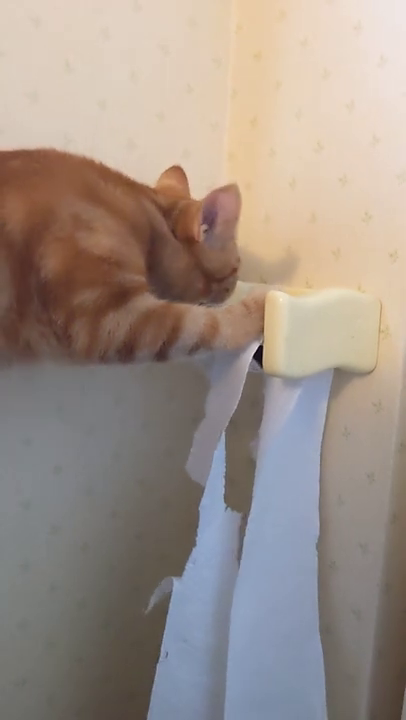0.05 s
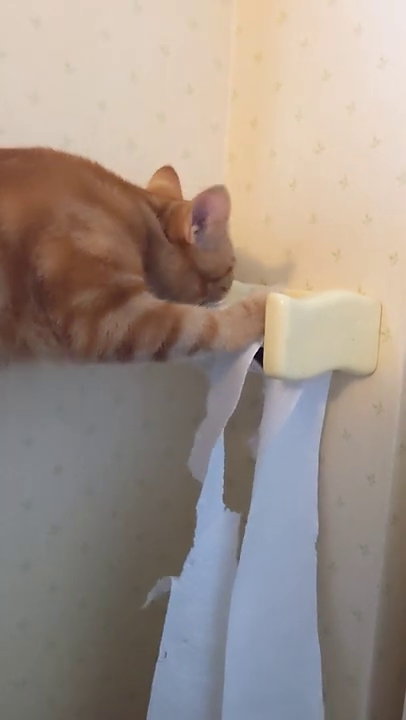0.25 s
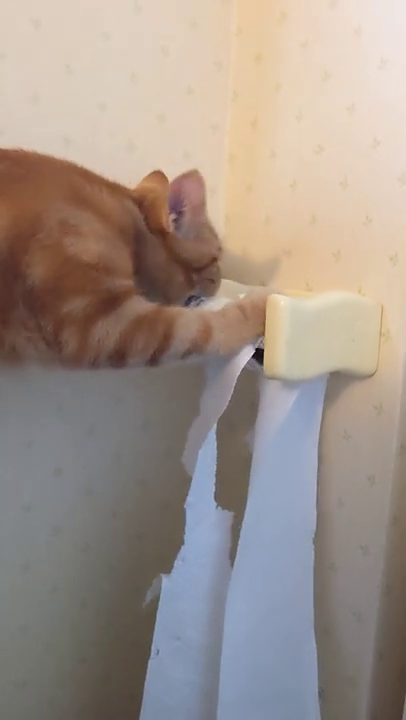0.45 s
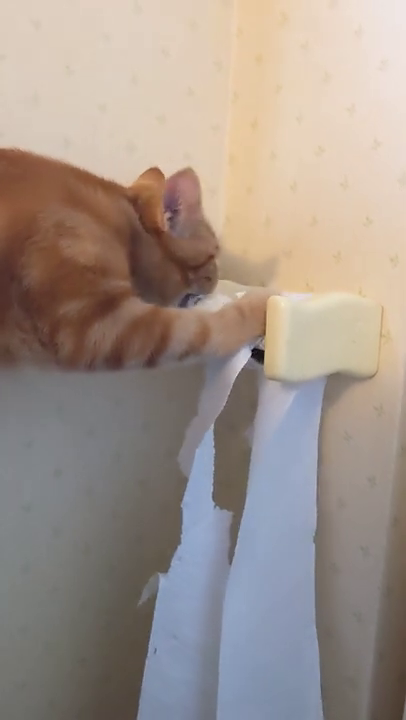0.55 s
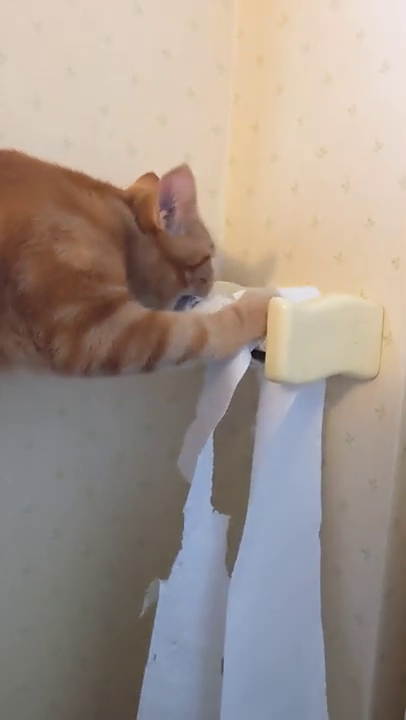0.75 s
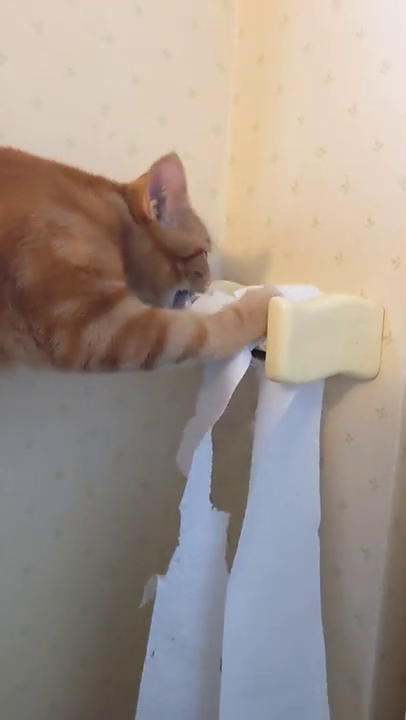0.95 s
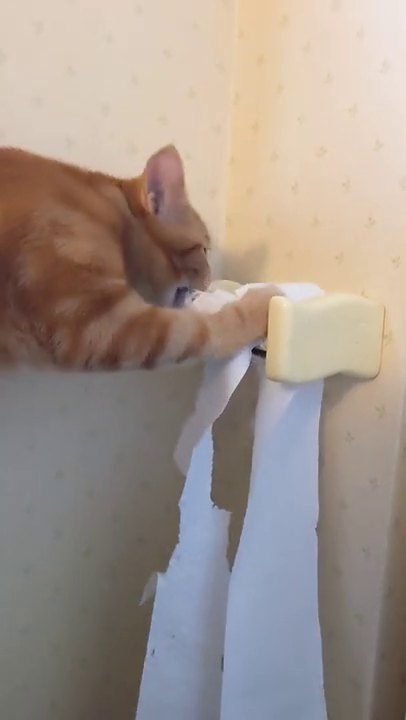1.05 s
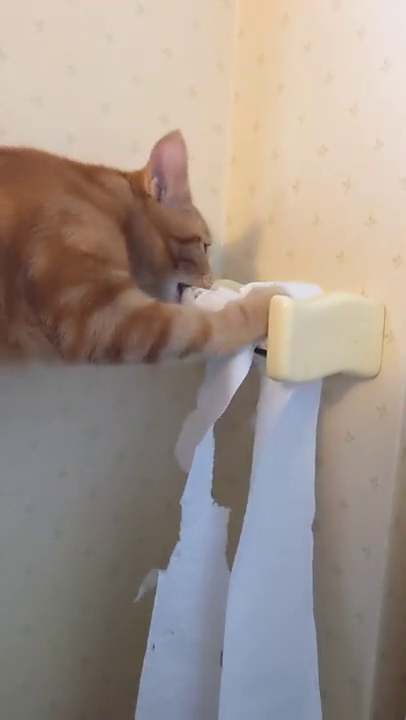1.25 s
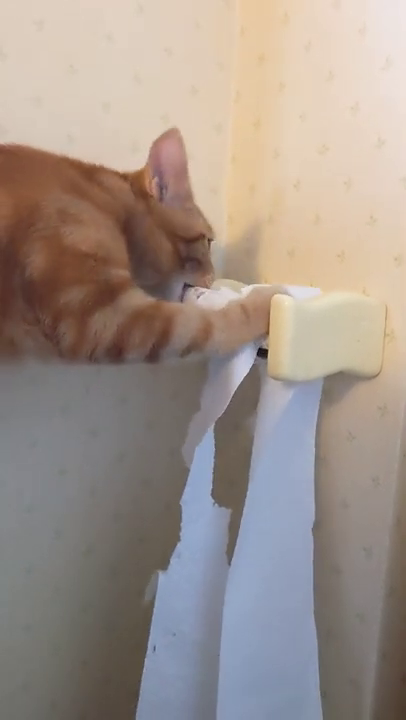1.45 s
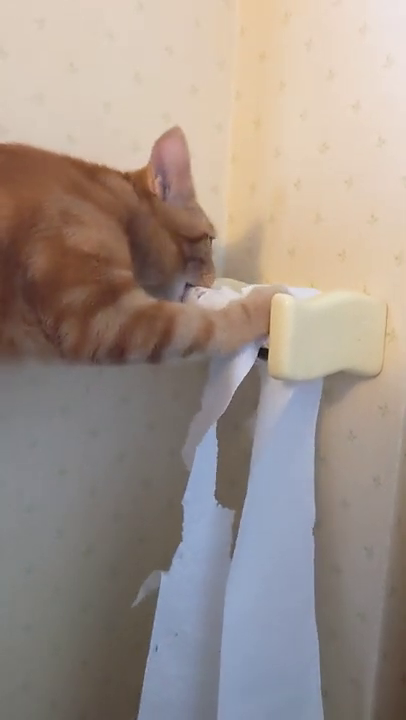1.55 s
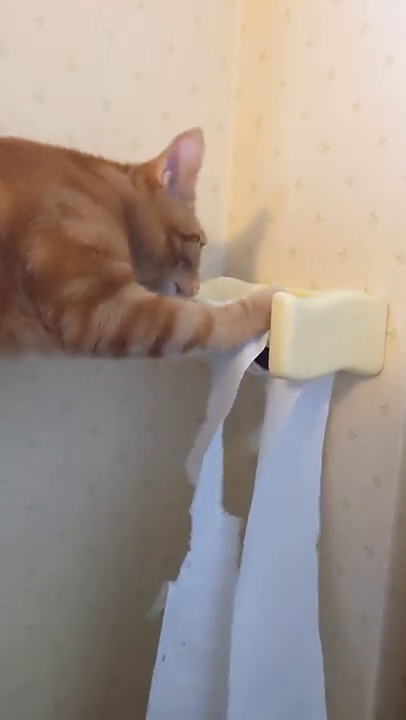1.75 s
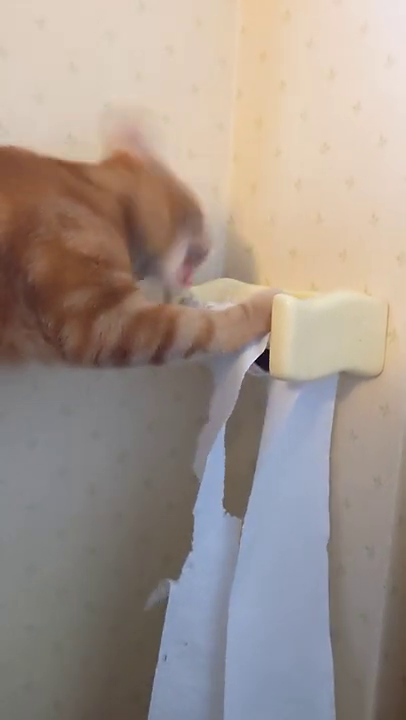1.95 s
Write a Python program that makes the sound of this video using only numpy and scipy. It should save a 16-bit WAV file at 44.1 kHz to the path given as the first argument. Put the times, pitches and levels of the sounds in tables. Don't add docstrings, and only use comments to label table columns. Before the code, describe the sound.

Sharp plastic clicks and hollow knocks from a wall-mounted paper roll holder, a busy rattle first, a near-silent gap, then lighter uneven knocks with faint paper rustle; close stereo pickup in a small hard room, slightly right.

```python
import sys
import numpy as np
from scipy import signal
from scipy.fft import rfft, irfft, next_fast_len
from scipy.io import wavfile
from scipy.ndimage import map_coordinates

SR = 44100
rng = np.random.default_rng(int(sys.argv[2]) if len(sys.argv) > 2 else 0)


def voltage_ratio(decibels):
    exponent = np.asarray(decibels, float) / 20
    return 10 ** exponent


def bounce(signal):
    frames = np.transpose(np.atleast_2d(signal))
    limited = np.clip(frames, -1, 1)
    pcm = np.round(limited * 32767).astype(np.int16)
    wavfile.write(sys.argv[1], SR, pcm)


N = 88200

# (frequency [Hz], level [dB per Hz])
AIR_COLOR = [(15, -38), (25, -8), (59, -11.5), (97, -22.5), (317, -22), (887, -33.5), (1440, -36.5),
             (8140, -52.5), (16000, -62.5)]
# (frequency [Hz], likeness [-1 to 1])
EAR_LIKENESS = [(60, 0.67), (240, 0.94), (950, -0.044), (3770, -0.039), (15000, -0.002)]
# (time [s], pitch [Hz], level [dB])
MAINS_HUM = [(0, 51.5, -63), (.5, 52, -62), (1.17, 52, -59), (1.23, 52, -68), (1.29, 52, -58),
             (1.6, 52, -60), (1.8, 52, -55), (2, 52, -55)]
# (frequency [Hz], fade time [s])
ROOM_FADE = [(200, 0.42), (1000, 0.32), (4000, 0.32), (12000, 0.36)]
# (delay [s], level [dB], left over right [dB])
NEAR_ECHOES = [(.0012, -12, 0), (.0019, -13, -2), (.0028, -9, 3), (.0045, -11, -3), (.008, -9, 0)]
# (time [s], level [dB])
PAPER_RUSTLE = [(0, -72), (.21, -79), (.228, -63), (.44, -95), (.75, -82), (.92, -80), (1.02, -71.5),
                (1.3, -58.5), (1.5, -71.5), (1.7, -67.5), (1.85, -67), (2, -108)]
# (frequency [Hz], level [dB per Hz])
PAPER_COLOR = [(880, -32), (1500, 0), (2900, -7), (4300, 0.5), (7000, -5), (16000, -12)]
# (time [s], drag on the panel [dB], drag on the shell over it [dB])
ROLL_DRAG = [(0, -53.5, -22), (.07, -57, -10), (.16, -68, -7), (.22, -56, -12), (.41, -55, -27),
             (.64, -51.5, -29), (.77, -77.5, -39), (.9, -91, -3), (1.03, -61, -3), (1.13, -50, -15),
             (1.33, -46.5, -3.5), (1.45, -65.5, -10), (1.52, -67.5, -18), (2, -62.5, -11)]
# (time [s], panel level [dB], bracket over it [dB])
MOUNT_PUSHES = [(0.103, -37, -10), (0.124, -42.5, -20), (0.232, -29.5, 3), (.241, -37, -25),
                (.255, -31.5, 3.5), (0.271, -42, 2), (.338, -46, 2), (.39, -45, 0), (0.429, -48.5, -2.5),
                (0.51, -43, -4), (1.101, -51, -3), (1.15, -43, 0), (1.179, -44.5, -1.5), (1.335, -40, -1.5),
                (1.42, -54, 5.5), (1.713, -42, -5), (1.72, -37, -7.5), (1.726, -48, -13),
                (1.74, -34.5, -14), (1.758, -34, -20), (1.798, -48, -5)]
# (time [s], level [dB])
MOUNT_SWAYS = [
    (.26, -41),
    (1.3, -48.5),
    (1.335, -43.5),
    (1.724, -39.5),
    (1.757, -42),
]
# (frequency [Hz], width [Hz], level [dB])
WALL_TONES = [(142, 130, -21), (211.3, 19.4, -11), (235.1, 8.6, -4), (270.4, 15.4, 1.5), (307, 11.5, 3),
              (346.4, 22, -0.5), (402, 39.6, -1.5)]
SWAY_TONES = [(313, 5.6, -1), (276.6, 8, -4.5)]
BRACKET_TONES = [(517, 128, -11), (518.7, 20, -7), (596, 58, 0), (628, 30, 1.5), (643, 144, -2),
                 (763, 110, -16.5), (902, 127, -6.5)]
# (frequency [Hz], width [Hz], level [dB])
SHELL_TONES = [(1025, 50, -4), (1156, 50, -2), (1306, 45, 1), (1400, 70, -8), (1535, 65, -3),
               (1800, 90, -4)]
SPINDLE_TONES = [(1800, 250, -1), (2190, 250, 0), (2650, 300, -1), (3200, 350, -3), (4300, 500, -5),
                 (5280, 500, -7), (7060, 400, -8)]
# (frequency [Hz], level [dB per Hz])
CLICK_COLOR = [(600, -24), (1400, -4), (2300, 7.5), (3300, 6), (4300, 5.5), (6500, -7.5), (16000, -51.5)]
EDGE_COLOR = [(2500, -31), (4000, 0), (5500, 7), (7100, 4), (8500, -3.5), (11000, -8.5), (15500, -13.5),
              (16800, -19)]
# (time [s], click [dB], wall thump over it [dB], shell ring over it [dB], top edge over it [dB])
FIRST_KNOCKS = [(0.1018, -45, 8.5, -3.5, -11.5), (0.2324, -26, -14.5, 8, -14), (0.2415, -40, -21, 8, -21),
                (0.253, -36.5, -4, 9, -28), (0.295, -31.5, -7, -5, -14), (0.3371, -29, -3.5, -3.5, -15),
                (0.316, -42, -21, -1, -8), (0.3642, -36.5, -15, -3.5, -16), (0.3897, -26, -15, -7.5, -16),
                (0.4126, -25, -26, -6, -16.5), (0.4321, -35.5, -27, 5, -9), (0.5262, -22.5, -17, -5, -13.5),
                (0.595, -30, -38, -5, -9), (0.6371, -27, -16, -6.5, -9.5), (0.6429, -36, -13, 0.5, -11),
                (.80, -58, 7.5, -9, -11), (.905, -69, -4, -11, -10), (0.9413, -57, 4, -1.5, -11.5)]
LATER_KNOCKS = [(.99, -59.5, 10, 0, -9.5), (1.038, -45, -26, -10, -9.5), (1.043, -54, -25, 4, -15),
                (1.092, -47, -14, -10, -10), (1.098, -41, 5, -4, -10), (1.118, -47.5, -15, 9, -16),
                (1.1455, -32.5, 0.5, -0.5, -11.5), (1.172, -32, -7, -0.5, -14.5),
                (1.2447, -33, -16, -3.5, -9), (1.26, -59, -14, 3, -2), (1.2906, -25.5, -5.5, -8, -9),
                (1.3773, -35, -10, -1, -13.5), (1.419, -44.5, 5.5, -27, -36),
                (1.7136, -26.5, 4, -6.5, -8.5), (1.9409, -55, 0, -7.5, -10)]

KNOCK_FADE_S, PUSH_FADE_S = .003, .006


def unit(x):
    return x / np.sqrt(np.mean(x ** 2) + 1e-20)


def along(points, hz):
    f, v = np.transpose(points)
    return np.interp(np.log(hz + 1), np.log(f + 1), v)


def curves(rows):
    times, *columns = np.transpose(rows)
    return [np.interp(np.arange(N) / SR, times, column) for column in columns]


def wobble(rate):
    knots = rng.standard_normal(int(N * rate / SR) + 4)
    return map_coordinates(knots, [np.arange(N) * rate / SR])


def filtered(x, response):
    m = 2 * next_fast_len(N // 2 + SR // 4)
    return irfft(rfft(x, m) * response(np.fft.rfftfreq(m, 1 / SR)), m)[..., :N]


def colour(points, hz):
    inside = (hz > points[0][0] * .7) * (hz < points[-1][0] * 1.05)
    return voltage_ratio(along(points, hz)) * inside


def causal(points):
    def shape(f):
        cepstrum = irfft(np.log(voltage_ratio(along(points, f))))
        cepstrum[1:len(cepstrum) // 2] *= 2
        cepstrum[len(cepstrum) // 2 + 1:] = 0
        answer = irfft(np.exp(rfft(cepstrum, 2 * len(f) - 2)))
        return rfft(answer / np.abs(answer).max())
    return shape


def body(tones):
    def shape(f):
        total = 0
        for k, (center, width, db) in enumerate(tones):
            sign = (-1) ** (k // 2)
            total = total + sign * voltage_ratio(db) * 1j * f * width / (center * center - f * f + 1j * f * width)
        low_cut = 1j * f / (tones[0][0] + 1j * f)
        high_cut = 1 / (1 + 1j * f / tones[-1][0]) ** 2
        return total * low_cut * high_cut

    top = np.abs(irfft(shape(np.fft.rfftfreq(8192, 1 / SR)))).max()
    return lambda f: shape(f) / top


def blows(times, levels_db, fade_s, rough=1):
    t = np.arange(1024) / SR
    out = np.zeros(N + 1024)
    force = rough * .09 * rng.standard_normal((len(times), len(t))) * voltage_ratio(-60 * t / fade_s)
    force[:, 0] = 1
    force *= voltage_ratio(np.array(levels_db))[:, None]
    starts = np.round(np.array(times) * SR).astype(int)
    np.add.at(out, starts[:, None] + np.arange(len(t)), force)
    return out[:N]


def ear_turn(hz):
    return np.arccos(np.clip(along(EAR_LIKENESS, hz), -1, 1)) / 2


def room_air():
    def response(f):
        turn = ear_turn(f)
        return voltage_ratio(along(AIR_COLOR, f)) * (f > 58) * [np.cos(turn), np.sin(turn)]

    mid, side = filtered(rng.standard_normal((2, N)), response)
    return voltage_ratio(-62.5) * unit(np.array([mid + side, mid - side]))


def mains_hum():
    hz, db = curves(MAINS_HUM)
    level = np.sqrt(2) * voltage_ratio(db + 1.4 * wobble(9.2))
    hum = level * np.sin(2 * np.pi * np.cumsum(hz) / SR + .4 * wobble(30.5))
    return hum * voltage_ratio([[-.4], [.4]])


def room(x):
    early_fade_s, early_db = 0.18, 3
    gap_s, shift_s = .001, .04
    hz, t, z = signal.stft(rng.standard_normal((2, 6, SR // 2)), SR, nperseg=128)
    turn = ear_turn(hz)[:, None]
    opposite = np.array([1, -1])[:, None, None, None]
    z = np.cos(turn) * z[0] + np.sin(turn) * z[1] * opposite
    fade = voltage_ratio(-60 * t / along(ROOM_FADE, hz)[:, None]) + voltage_ratio(early_db - 60 * t / early_fade_s)
    tail = signal.istft(z * fade, SR, nperseg=128)[1]
    poses = np.arange(N) // round(shift_s * SR) % 6 == np.arange(6)[:, None]
    parts = np.pad(x * poses, ((0, 0), (round(gap_s * SR), 0)))
    echoes = signal.fftconvolve(parts[None], tail / np.linalg.norm(tail[0, 0]), axes=2)
    return echoes.sum(axis=1)[:, :N]


def placed(x, lag_s, pan_db, walls_db=0):
    side = np.array([[.5], [-.5]])
    jitter = rng.uniform(-0.00047, 0.00045, (len(NEAR_ECHOES), 2, 1))

    def response(f):
        direct = voltage_ratio(pan_db * side) * np.exp(-2j * np.pi * f * lag_s * side)
        walls = 0
        for (delay, db, left_right_db), shift in zip(NEAR_ECHOES, jitter):
            walls = walls + voltage_ratio(db + left_right_db * side) * np.exp(-2j * np.pi * f * (delay + shift))
        return direct + voltage_ratio(walls_db) * walls

    return filtered(x, response)


def paper():
    level_db, = curves(PAPER_RUSTLE)
    grains = rng.standard_normal(N) * voltage_ratio(5 * wobble(500))
    return voltage_ratio(level_db - 2.5) * unit(filtered(grains, lambda f: colour(PAPER_COLOR, f)))


def roll_drag(tones):
    judder = voltage_ratio(5.2 * wobble(60)) * rng.standard_normal(N)
    return unit(filtered(judder, body(tones)))


def wall_panel():
    s, click_db, thump_db, _, _ = np.transpose(FIRST_KNOCKS + LATER_KNOCKS)
    push_s, push_db, _ = np.transpose(MOUNT_PUSHES)
    drag_db, _ = curves(ROLL_DRAG)
    push = blows(s, click_db + thump_db - 5, KNOCK_FADE_S) + blows(push_s, push_db - 1.5, PUSH_FADE_S)
    thump = filtered(push, body(WALL_TONES))
    drag = voltage_ratio(drag_db - 2.0) * roll_drag(WALL_TONES + BRACKET_TONES[:3])
    sway = filtered(blows(*np.transpose(MOUNT_SWAYS), PUSH_FADE_S), body(SWAY_TONES))
    return thump + drag + sway


def hollow_shell():
    s, click_db, _, ring_db, _ = np.transpose(FIRST_KNOCKS + LATER_KNOCKS)
    push_s, push_db, bracket_db = np.transpose(MOUNT_PUSHES)
    drag_db, scrape_db = curves(ROLL_DRAG)
    ring = filtered(blows(s, click_db + ring_db + 4.5, KNOCK_FADE_S), body(SHELL_TONES))
    scrape = voltage_ratio(drag_db + scrape_db) * roll_drag(SHELL_TONES)
    bracket = filtered(blows(push_s, push_db + bracket_db + 1.5, PUSH_FADE_S), body(BRACKET_TONES))
    return ring + scrape + bracket


def spindle_clicks():
    s, click_db, _, _, edge_db = np.transpose(FIRST_KNOCKS + LATER_KNOCKS)
    hit = blows(s, click_db + 4, KNOCK_FADE_S)
    click = filtered(hit, causal(CLICK_COLOR))
    ring = voltage_ratio(-13) * filtered(hit, body(SPINDLE_TONES))
    edge = filtered(blows(s, click_db + edge_db + 13, KNOCK_FADE_S, rough=2), causal(EDGE_COLOR))
    return click + ring + edge


def scene():
    wall = wall_panel()
    shell = hollow_shell()
    bright = spindle_clicks() + paper()
    near = placed(bright, .00011, -7) + placed(shell, .0003, -0.77, walls_db=-6.5) + wall
    far = room(bright + voltage_ratio(-6.5) * shell + voltage_ratio(-10.5) * wall) * voltage_ratio([[-1.8], [1.8]])
    return near + voltage_ratio(2.5) * far + room_air() + mains_hum()


def top_cut(x):
    return signal.sosfilt(signal.butter(12, 17000, fs=SR, output="sos"), x)


def record(dry):
    mix = filtered(dry, lambda f: 1 / (1 + (f / 15900) ** 60))
    return top_cut(mix)


dry = scene()
out = record(dry)
bounce(out)
```